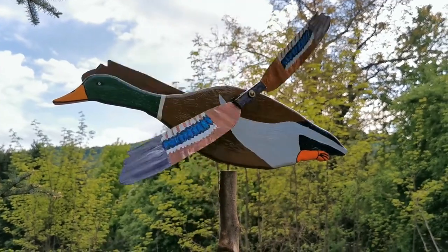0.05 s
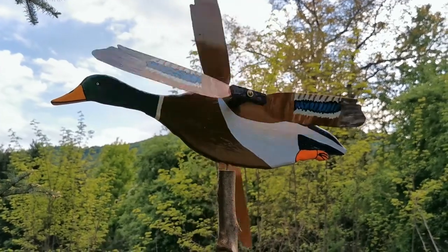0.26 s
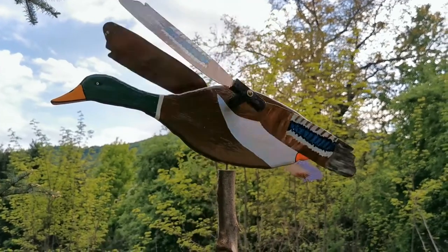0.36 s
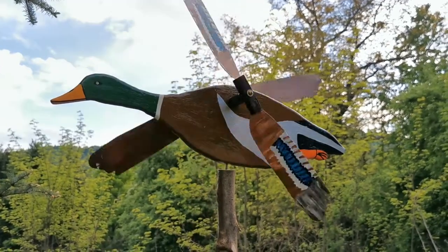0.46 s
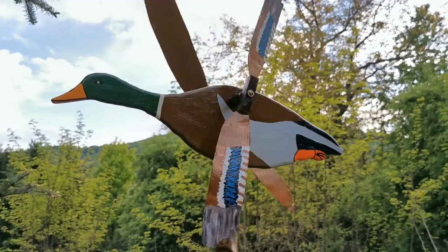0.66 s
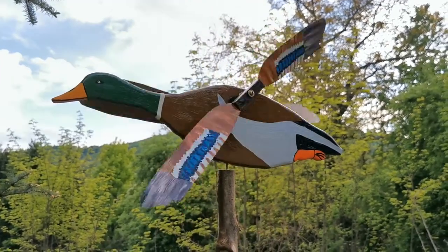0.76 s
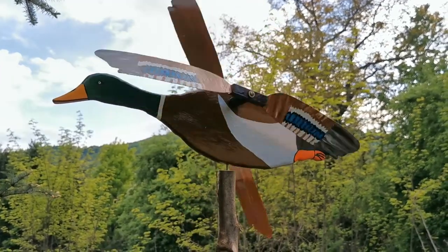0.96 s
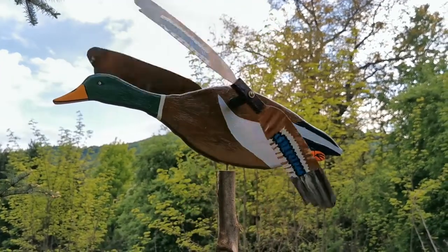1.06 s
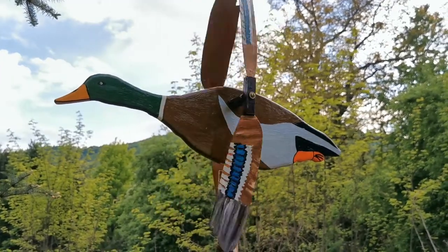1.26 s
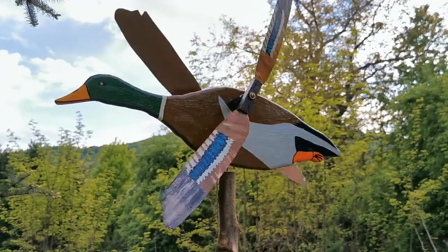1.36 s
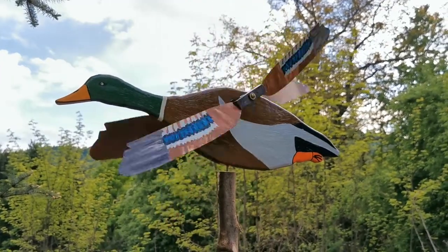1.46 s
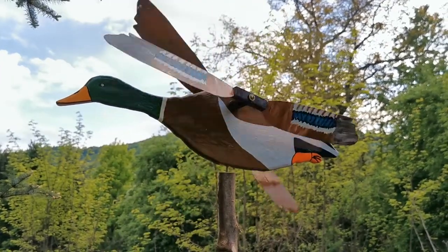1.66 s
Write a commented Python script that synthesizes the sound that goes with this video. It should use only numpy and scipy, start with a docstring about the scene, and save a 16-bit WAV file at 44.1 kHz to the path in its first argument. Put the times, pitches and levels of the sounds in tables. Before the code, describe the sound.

Light gusts of low wind rumble, with faint wooden whirligig clacks and birdsong.

```python
"""Whirligig in a light breeze

A wooden duck whirligig turns at the edge of a wood. Turbulent gusts buffet the two microphone ports
over a faint hush of leaves. Birds trill, peep and whistle, their notes scattered by the trees.
The loose wing hubs strike their axle, exciting damped modes of wood and metal,
and a dry snap stutters close to the right port."""
import sys
import numpy as np
from scipy import signal
from scipy.fft import rfft, irfft
from scipy.io import wavfile
from scipy.ndimage import uniform_filter1d

SR = 44100
rng = np.random.default_rng(int(sys.argv[2]) if len(sys.argv) > 2 else 0)


def persist_wave(psi):
    """Save psi, clipped to +-1, as 16-bit WAV."""
    counts = np.round(np.clip(psi, -1, 1) * 32767).astype(np.int16)
    wavfile.write(sys.argv[1], SR, np.atleast_2d(counts).T)


N = 74970


def undb(db):
    """Amplitude ratio of a level in decibels."""
    return 10 ** (np.asarray(db) / 20)


def unit(x):
    """Normalisation to rms 1."""
    return x / np.sqrt(np.mean(x ** 2))


def pan(pan_db):
    """Constant-power gains for a level difference, left minus right."""
    gains = undb(np.array([pan_db, -pan_db]) / 2).reshape(2, -1)
    return gains / np.sqrt(np.mean(gains ** 2, axis=0))


def delay_left(x, lag_s):
    """Arrival-time difference: a linear phase shift delays the left port."""
    hz = np.fft.rfftfreq(N, 1 / SR)
    return np.array([irfft(rfft(x[0]) * np.exp(-2j * np.pi * hz * lag_s), N), x[1]])


def noise(spectrum, shared=0):
    """Partly coherent noise of rms 1: a share of its power is common to both ports."""
    hz, db = np.array(spectrum, float).T
    bins_hz = np.maximum(np.fft.rfftfreq(N, 1 / SR), 1)
    white = rng.standard_normal((3, N))
    pair = np.sqrt(1 - shared) * white[:2] + np.sqrt(shared) * white[2]
    return unit(irfft(rfft(pair) * undb(np.interp(np.log(bins_hz), np.log(hz), db)), N))


def walk(rate_hz):
    """Low-pass noise: a smooth random drift of rms 1."""
    width = max(int(SR / rate_hz), 1)
    return unit(uniform_filter1d(uniform_filter1d(rng.standard_normal(N), width), width))


def fade(age, t60):
    """Exponential decay from age 0, falling 60 dB in t60 seconds."""
    return (age >= 0) * np.exp(-np.log(1000) * np.maximum(age, 0) / t60)


def eddies(spectrum, window_s=0.016, evenness=0.68):
    """Turbulent pressure, independent at each port, with its envelope partly levelled."""
    pressure = noise(spectrum)
    power = uniform_filter1d(np.abs(signal.hilbert(pressure)) ** 2, int(window_s * SR), axis=1)
    return unit(pressure / power ** (evenness / 2))


# wind on the ports: time_s, level_db, pan_db
GUSTS = [(0,-47,16),(.08,-48.5,14),(0.139,-54.5,-8),(.21,-45.5,9),(0.292,-35,13),(0.344,-30.5,6.5),(.385,-37,2),(.44,-38,9.5),(0.507,-38.5,2.5),(.54,-43.5,2),(.66,-45.5,0),(.745,-41,10),(0.808,-44,-14.5),(0.864,-55.5,2.5),(0.912,-42,-12),(.97,-53,-6),(1.07,-64.5,-8),(1.145,-55,5),(1.177,-42,29),(1.22,-32,13),(1.253,-46.5,-14),(1.287,-34,0.5),(1.35,-36,2.5),(1.46,-48,-13),(1.53,-59,1),(1.64,-61.5,2),(1.7,-44.5,-3.5)]
# slow eddies, and the churn of stronger air: frequency_hz, density_db
RUMBLE_SPECTRUM = [(12,-17),(25,-1.5),(47,4.5),(80,-1.5),(120,-22),(190,-30),(300,-48),(2000,-120)]
CHURN_SPECTRUM = [(40,-25.5),(80,10),(130,4),(170,-4.5),(240,-25),(340,-46),(600,-56),(2000,-120)]

def wind(t, churn_db=-9.5, reference_db=-43.5, growth=0.43):
    """Turbulence rumbles on the ports; churn grows faster than rumble, so strong gusts are brighter."""
    times, levels, sides = np.array(GUSTS).T
    gust_db = np.interp(t, times, levels)
    churn = eddies(CHURN_SPECTRUM) * undb(churn_db + growth * (gust_db - reference_db))
    return (eddies(RUMBLE_SPECTRUM) + churn) * undb(gust_db) * pan(np.interp(t, times, sides))


# still air and leaves: frequency_hz, density_db
HUSH_SPECTRUM = [(30,3.5),(100,-16),(200,-11),(330,-10.5),(500,-16.5),(760,-10.5),(1050,-15),(1400,-21.5),(2600,-18),(3700,-24.5),(4900,-19.5),(5700,-31.5),(6600,-32),(7600,-42.5),(11000,-36),(16000,-39.5)]

def leaves(level_db=-57.5, flicker_db=0.87):
    """Broadband noise, faintly modulated in amplitude, reaches the left port first."""
    hush = delay_left(noise(HUSH_SPECTRUM, shared=0.32), lag_s=-0.0002074)
    return hush * undb(level_db + flicker_db * walk(6.7)) * pan(-2)


def voice(t, start, length, hz, rough, edge_s, smear_hz=230):
    """Narrowband modulation spreads the rough share of a tone's power around its pitch."""
    smear = np.resize(walk(smear_hz) + 1j * walk(smear_hz), len(t)) / np.sqrt(2)
    swell = np.clip(np.minimum(t - start, start + length - t) / edge_s, 0, 1)
    tone = (np.sqrt(1 - rough) + np.sqrt(rough) * smear) * np.exp(2j * np.pi * np.cumsum(hz) / SR)
    return np.sqrt(2) * swell * tone.imag


def note(t, start, length, first, middle, last, depth_hz=0, *, rough, edge_s, warble_hz=61.34):
    """Frequency modulation: a wavering parabola through three pitches, with optional warble."""
    u = np.clip((t - start) / length, 0, 1)
    arc = first * (1 - u) * (1 - 2 * u) + middle * 4 * u * (1 - u) + last * u * (2 * u - 1)
    drift = np.resize(walk(146.5), len(t))
    warble = np.sin(2 * np.pi * np.cumsum(warble_hz * (1 + 0.22 * drift)) / SR)
    return voice(t, start, length, arc * (1 + 0.00583 * drift) + depth_hz * warble, rough, edge_s)


# far calls: start_s, length_s, first_hz, middle_hz, last_hz, depth_hz, level_db, pan_db
TRILL_NOTES = [(-.06,0.21,3220,3137,2910,280,-61.5,-3),(0.212,0.15,6280,6444,6570,120,-69.5,-13),(0.271,0.18,3734,3510,3366,167,-61.5,3),(0.384,0.109,4200,4303,4315,146,-59,-1),(0.424,0.16,4770,4757,4693,245,-64,-5),(0.584,0.135,2940,2898,2756,225,-59.5,-3),(0.81,0.24,2920,2828,2646,130,-66,-3),(0.887,0.167,2360,2431,2334,101,-56.5,-5.5),(1.059,0.11,2430,2341,2350,102,-65,0),(1.339,0.12,2350,2685,2080,141,-58.5,-4)]

def trills(t):
    """Rapid frequency modulation makes rough, soft-edged notes trill."""
    return sum(note(t, *shape, rough=0.7, edge_s=0.03) * undb(db) * pan(side)
               for *shape, db, side in TRILL_NOTES)


# a nearer bird: start_s, length_s, first_hz, middle_hz, last_hz, level_db, pan_db
PEEP_NOTES = [(0.187,0.05,7350,7900,8300,-72.5,-7),(0.782,0.029,4490,4320,4540,-58,-8),(1.57,0.066,4850,4340,4130,-65,5)]
PEEP_ROUGH, PEEP_EDGE_S = 0.15, 0.0023

def peeps(t):
    """Short glides of nearly pure tone make thin, high calls."""
    return sum(note(t, *shape, rough=PEEP_ROUGH, edge_s=PEEP_EDGE_S) * undb(db) * pan(side)
               for *shape, db, side in PEEP_NOTES)


# birdsong: start_s, length_s, first_hz, middle_hz, last_hz, rough_share, level_db, pan_db
WHISTLE_NOTES = [(0.215,0.095,2260,2242,2256,0,-69,-11),(0.488,0.096,1670,1773,1862,0.3,-61.5,-8.5),(0.592,0.1,1850,1994,1945,0.62,-57.5,0.5),(0.695,0.045,2850,2660,2510,0.42,-55,-21),(0.734,0.13,3400,3355,3290,0.5,-69.5,3),(0.737,0.09,2620,2645,2560,0.6,-62.5,-2),(0.82,0.066,2480,2377,2320,0.28,-59,-5),(0.906,0.0548,2400,2162,1910,0,-54.5,-1),(1.045,0.036,2270,2097,1880,0.2,-51.5,-1),(1.264,0.098,1800,2094,2445,.35,-58,-0.5),(1.534,0.055,2400,2285,2310,0.2,-61.5,-8),(1.601,0.076,2270,2281,2253,0,-55.5,-5.5)]

def whistles(t):
    """A single partial glides through each note, pure or roughened."""
    return sum(note(t, *shape, rough=rough, edge_s=0.0058) * undb(db) * pan(side)
               for *shape, rough, db, side in WHISTLE_NOTES)


def trees(x, t60_s=0.44, build_s=0.0078):
    """Scattering from trunks and foliage: an echo builds and decays, different at each port."""
    t = np.arange(N) / SR
    tail = rng.standard_normal((2, N)) * fade(t, t60_s) * (1 - np.exp(-t / build_s))
    tail /= np.sqrt(np.sum(tail ** 2, axis=1, keepdims=True))
    return signal.fftconvolve(x, tail, axes=1)[:, :x.shape[1]]


def birds():
    """The direct-to-reverberant ratio falls with distance: farther birds arrive more as echo."""
    lead = SR // 10  # the first trill is already under way at time 0
    t = np.arange(-lead, N) / SR
    song, far, near = whistles(t), trills(t), chirp(t) + peeps(t)
    direct = song + undb(-5) * far + near
    echo = trees(undb(-4) * song + far + undb(-8) * near)
    return delay_left((direct + echo)[:, lead:], lag_s=0.000316)


# eddies at gust peaks: frequency_hz, density_db
FLUTTER_SPECTRUM = [(50,-18),(100,-2.5),(140,2),(185,-4.5),(240,-9),(340,-15.5),(420,-32.5),(600,-32.5),(900,-75),(3000,-100)]
# their bursts: centre_s, sigma_s, level_db, pan_db
FLUTTER_BURSTS = [(0.304,0.0085,-42,24),(0.371,0.016,-30,36),(0.415,0.018,-42.5,2),(0.723,0.01,-45,2),(1.298,0.01,-51.5,23),(1.338,0.0048,-38.5,25)]

def flutter(t):
    """Faster turbulence buffets the ports in brief Gaussian bursts."""
    bursts = sum(undb(db) * pan(side) * np.exp(-((t - centre) / sigma) ** 2 / 2)
                 for centre, sigma, db, side in FLUTTER_BURSTS)
    return eddies(FLUTTER_SPECTRUM) * bursts


def ring(modes, age, scatter=0.0048):
    """Free vibration: damped modes, randomly detuned per blow, with a random phase at each port."""
    out = 0
    for hz, db, t60 in modes:
        detuned_hz = hz * (1 + scatter * rng.standard_normal())
        phase = 2 * np.pi * detuned_hz * age + rng.standard_normal((2, 1))
        out += undb(db) * fade(age, t60) * np.sin(phase)
    return out


# modes of the wooden body, hub and metal axle: pitch_hz, level_db, t60_s
BODY_MODES = [(300,1,0.051),(398,-0.5,0.044),(580,0.5,0.054),(677,4.5,0.037),(780,-7,0.069),(881,-10,0.063),(1150,6.5,0.01),(1405,-6,0.06)]
HUB_MODES = [(1774,-6,0.056),(2137,2.5,0.023)]
AXLE_MODES = [(3360,-3,0.022),(4000,-16.5,0.026)]
# contact noise: frequency_hz, density_db
CLACK_SPECTRUM = [(300,-1),(900,1.5),(1400,-2),(2300,5),(2800,-2),(3400,-5.5),(4000,-4),(5200,-0.5),(6200,-14.5),(8000,-29),(16000,-43)]
TICK_SPECTRUM = [(1500,-37),(4500,12),(6500,1),(9000,-6),(12000,-1.5),(16000,-23)]
# wing hub impacts: start_s, body_db, clack_db, hub_db, axle_db, tick_db, pan_db
HUB_BLOWS = [(.396,-58.5,-42.5,-59,-34,-73,-3),(0.418,-56,-48,-68,-44,-65,-4.5),(0.617,-90,-54,-80,-73,-55,9),(0.699,-69,-60,-53,-62,-63,-11),(0.924,-54.5,-68,-76,-69,-67,-16),(1.0928,-52.5,-56,-52,-75,-75,2),(1.1063,-50.5,-54.5,-43,-76,-60,-3),(1.247,-55,-59.5,-72,-56,-56,-9.5),(1.453,-51,-65,-59,-79,-71,-22),(1.464,-58,-68,-52,-78,-59.5,13),(1.477,-50,-80,-76,-80,-59,-16)]

def whirligig(t, contact_s=0.001, rattle_db=-15.5):
    """Impact excitation: each blow of a loose hub makes contact noise and rings body, hub and axle."""
    out = np.zeros((2, N))
    clack, tick = noise(CLACK_SPECTRUM, shared=0.82), noise(TICK_SPECTRUM)
    for start, body_db, clack_db, hub_db, axle_db, tick_db, side in HUB_BLOWS:
        span = slice(int(start * SR), int(start * SR) + SR // 5)
        age = t[span] - t[span][0]
        clack_decay = fade(age, t60=0.017) + undb(rattle_db) * fade(age, t60=0.19)
        blow = undb(body_db) * ring(BODY_MODES, age)
        blow += undb(hub_db) * ring(HUB_MODES, age)
        blow += undb(axle_db) * ring(AXLE_MODES, age)
        blow += undb(clack_db) * clack[:, span] * clack_decay
        blow += undb(tick_db) * tick[:, span] * fade(age, t60=0.023)
        out[:, span] += blow * np.minimum(age / contact_s, 1) * pan(side)
    return out


# a dry double snap and its weaker stutter: start_s, level_db, tilt_db_per_octave
SNAP_EVENTS = [(0.7449,-40.5,8),(0.748,-38,-15),(0.759,-51,2),(0.766,-49,-6),(0.77,-49,-12),(0.776,-47,-20),(0.799,-54,7)]
# its ring: pitch_hz, level_db, t60_s
SNAP_MODES = [(5780,1,0.01),(6540,5,0.0066),(8950,-4,0.0057),(11600,-8,0.0029)]

def snaps(rise_s=0.0005, echo_db=-14):
    """High modes, damped within milliseconds, sound as snaps close to the right port."""
    out, age = np.zeros((2, N)), np.arange(SR // 20) / SR
    attack = 1 - np.exp(-(age / rise_s) ** 2)
    lowest_hz = SNAP_MODES[0][0]
    for start_s, level_db, tilt in SNAP_EVENTS:
        start = int(start_s * SR)
        modes = [(hz, db + tilt * np.log2(hz / lowest_hz), t60) for hz, db, t60 in SNAP_MODES]
        out[:, start:start + len(age)] += undb(level_db) * ring(modes, age, scatter=0.051) * attack
    return (out + undb(echo_db) * trees(out)) * pan(-15)


# contour of one high bird call: time_s, pitch_hz
CHIRP_CONTOUR = [(1.636,6650),(1.644,6780),(1.661,6200),(1.668,6120),(1.682,6680),(1.691,6300)]

def chirp(t, level_db=-65):
    """A frequency sweep that dips, rises again and hooks down."""
    times, hz = np.array(CHIRP_CONTOUR).T
    call = voice(t, times[0], times[-1] - times[0], np.interp(t, times, hz), PEEP_ROUGH, PEEP_EDGE_S)
    return call * undb(level_db) * pan(-13)


def scene():
    """Superposition: the pressures of all sources add at each port."""
    t = np.arange(N) / SR
    return wind(t) + flutter(t) + leaves() + whirligig(t) + snaps() + birds()


def record(dry):
    """Band limiting: a steep elliptic low-pass removes the highest treble."""
    cutoff_hz = 15850
    return signal.sosfilt(signal.ellip(10, .2, 70, cutoff_hz, fs=SR, output="sos"), dry)


dry = scene()
out = record(dry)
persist_wave(out)
```